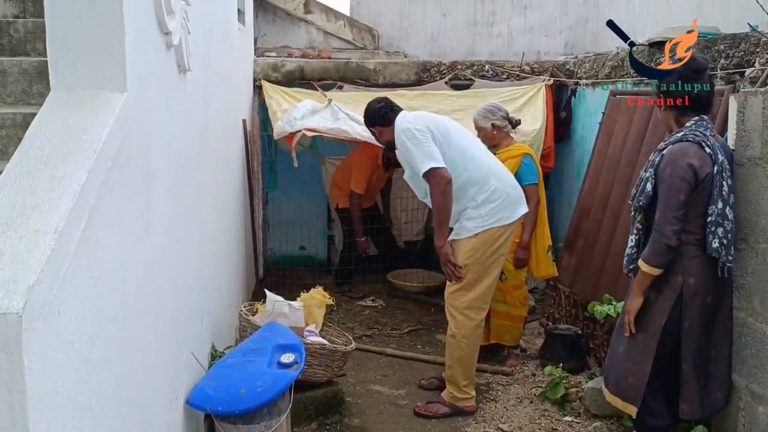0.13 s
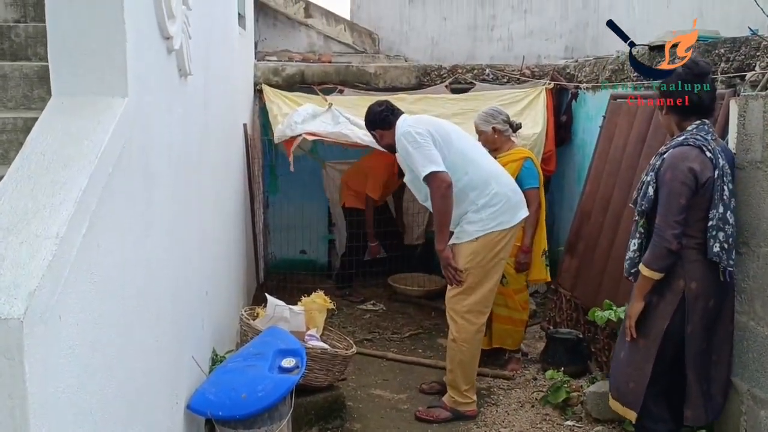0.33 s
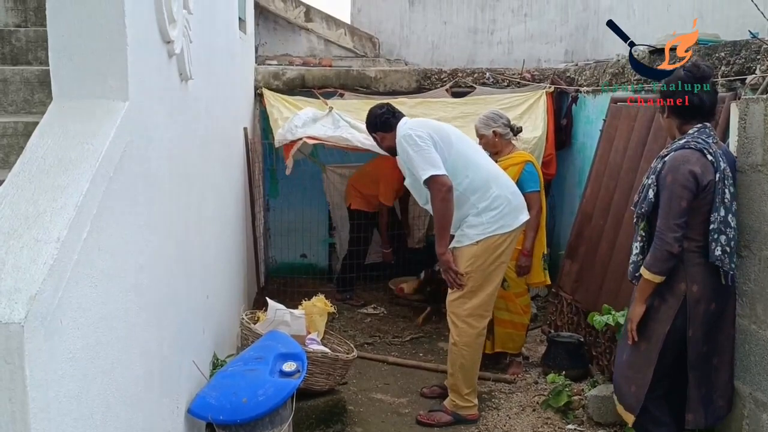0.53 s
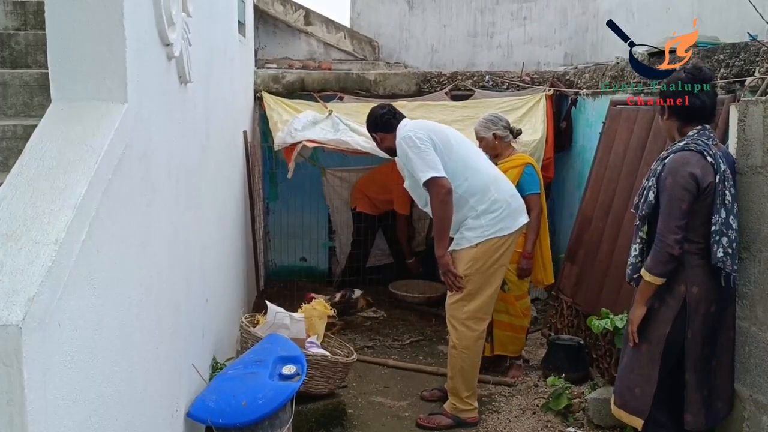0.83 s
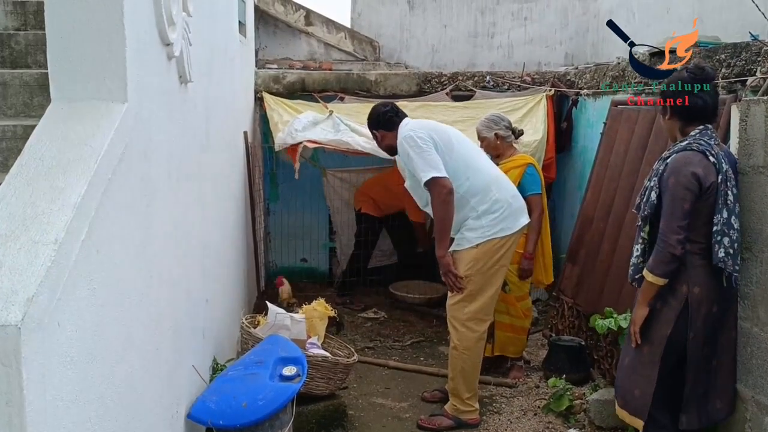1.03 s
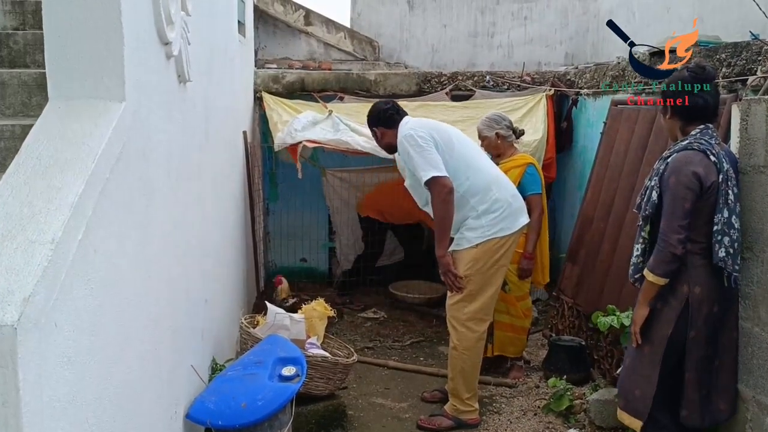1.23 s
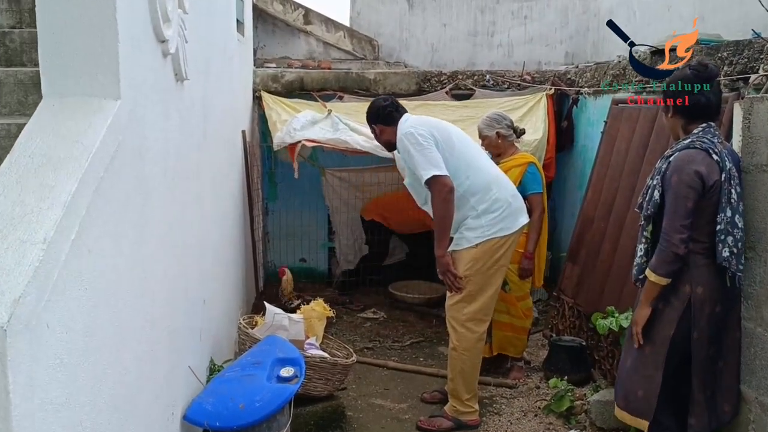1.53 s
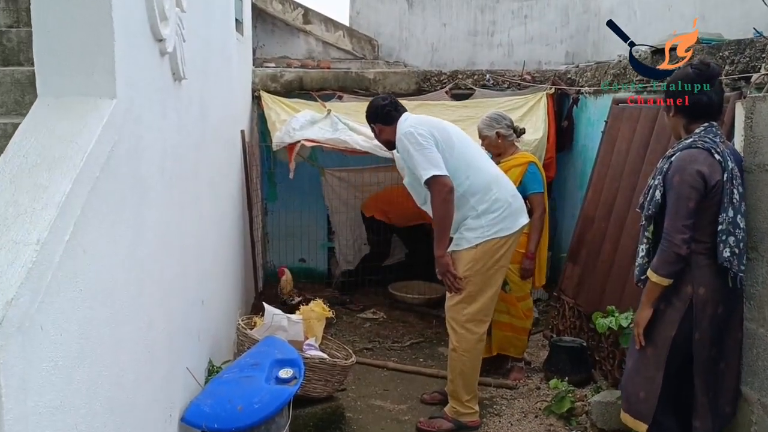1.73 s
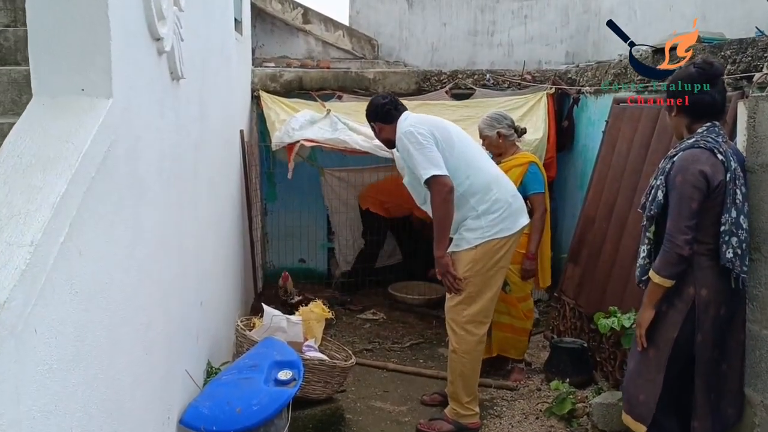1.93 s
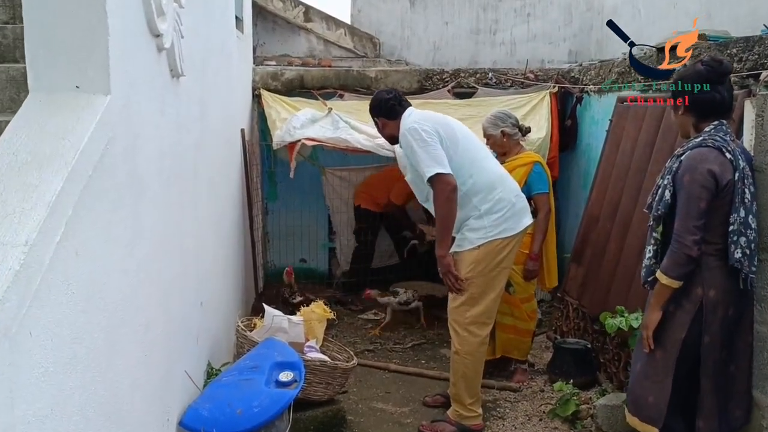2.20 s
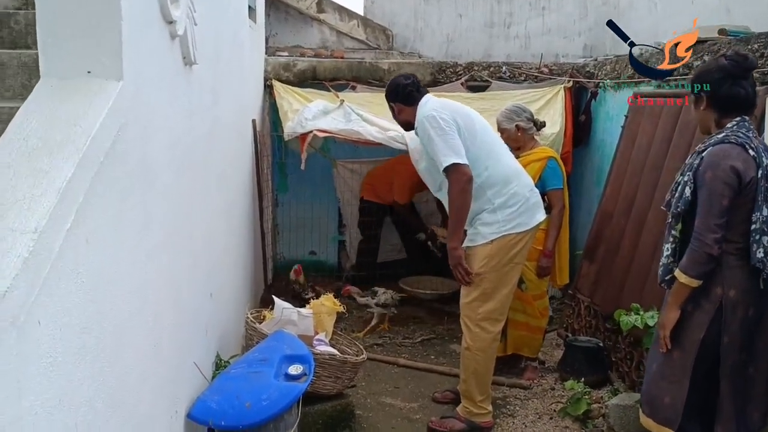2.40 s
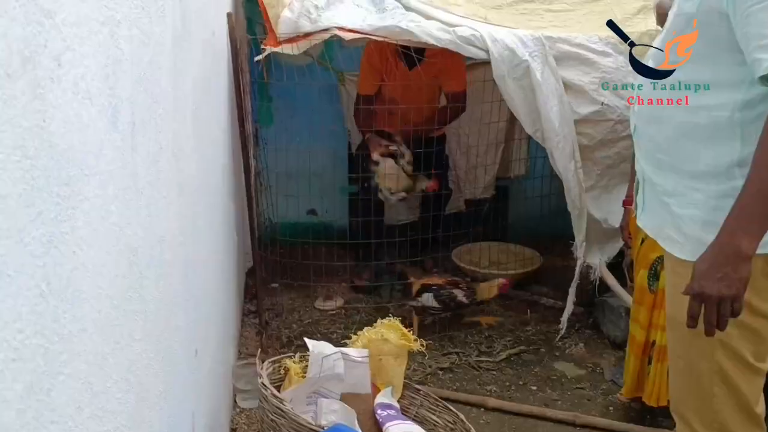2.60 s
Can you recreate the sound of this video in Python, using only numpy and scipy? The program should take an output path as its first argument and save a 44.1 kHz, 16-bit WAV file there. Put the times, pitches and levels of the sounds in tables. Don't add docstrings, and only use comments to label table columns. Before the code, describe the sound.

Chicken clucks building into harsh, fluttering squawks in a walled yard, with wing flaps and wind thumps

```python
import sys
import numpy as np
from scipy import signal
from scipy.fft import rfft, irfft, next_fast_len
from scipy.io import wavfile
from scipy.ndimage import map_coordinates

SR = 44100
rng = np.random.default_rng(int(sys.argv[2]) if len(sys.argv) > 2 else 0)


def materialize(psi):
    bounded = np.clip(np.atleast_2d(psi).T, -1, 1)
    quanta = np.round(bounded * 32767).astype(np.int16)
    wavfile.write(sys.argv[1], SR, quanta)


def to_linear_factor(level_db):
    exponent = np.asarray(level_db, float) / 20
    return 10 ** exponent


N = 121275
SPAN = 30000
LEFT_PUFF_DB = -18.5


def unit(x):
    return x / np.sqrt(np.mean(x ** 2) + 1e-20)


def along(points, hz):
    f, v = np.transpose(points)
    return np.interp(np.log(hz + 1), np.log(f + 1), v)


def wobble(rate_hz, size):
    knots = rng.standard_normal(size // 40)
    return map_coordinates(knots, [np.arange(size) * rate_hz / SR], mode="wrap")


def filtered(x, response):
    n = x.shape[-1]
    m = next_fast_len(n + 4096)
    return irfft(rfft(x, m) * response(np.fft.rfftfreq(m, 1 / SR)), m)[..., :n]


def shaped_noise(shape, points):
    return filtered(rng.standard_normal(shape), lambda f: to_linear_factor(along(points, f)))


def peak(f, hz, width_hz):
    return 1j * f * width_hz / (hz * hz - f * f + 1j * f * width_hz)


def add(track, s, x):
    i = max(round(s * SR), 0)
    track[:, i:i + x.shape[1]] += x[:, :N - i]


# frequency in Hz, t60 in s.
SHED_DECAY = [(250, 0.61), (1000, 0.31), (3000, 0.22), (9000, 0.13)]


def shed(x, lead_ms):
    wall_db, wall_s, tail_db, wide_above_hz = -2, .025, -5.5, 800
    direct, tail_start = 30, 300
    echo = np.zeros((2, SPAN))
    where, size = rng.random((2, 2, 8))
    for side in range(2):
        at = (40 + where[side] * wall_s * SR).astype(int)
        echo[side, at] = to_linear_factor(wall_db) * (2 * size[side] - 1)

    hz, t, z = signal.stft(rng.standard_normal((2, SPAN)), SR, nperseg=256)
    fade = to_linear_factor(-60 * t / along(SHED_DECAY, hz)[:, None])
    tail = signal.istft(z * fade, SR, nperseg=256)[1][:, :SPAN - tail_start]
    echo[:, tail_start:] += to_linear_factor(tail_db) * tail / np.linalg.norm(tail[0])

    half_gap = filtered(echo[0] - echo[1], lambda f: 1 / (1 + (f / wide_above_hz) ** 2)) / 2
    echo += np.array([-half_gap, half_gap])
    echo[:, direct] += 1
    wet = signal.fftconvolve(x[None], echo, axes=1)[:, :SPAN]
    sign = np.array([[1], [-1]])
    return filtered(wet, lambda f: np.exp(1j * np.pi * f * lead_ms / 1000 * sign))[:, direct:]


def syrinx(t, length_s, start_hz, end_hz, rough, highest_hz):
    scoop, scoop_s = .05, .008
    jitter, jitter_rate_hz, uneven = .065, 200, .7
    bend = 1 - scoop * np.exp(-t / scoop_s) + jitter * rough * wobble(jitter_rate_hz, len(t))
    hz = np.interp(t, [0, length_s], [start_hz, end_hz]) * bend
    turn = 2 * np.pi * np.cumsum(hz) / SR
    harmonics = np.arange(1, int(highest_hz / start_hz) + 1)
    pulses = unit(np.cos(np.outer(harmonics, turn)).sum(0))
    pulses *= 1 + uneven * rough * np.cos(turn / 2)
    breath = unit(rng.standard_normal(len(t)) * (1 + np.cos(turn)))
    return pulses, breath, turn


# frequency in Hz, level in dB per Hz.
HISS = [(3000, -16), (4100, -46), (5200, -9), (6600, 7), (7500, 0.5), (9000, 7), (11000, -8),
        (15000, -20.5)]
# frequency in Hz, width in Hz, level in dB.
BEAK = [(1980, 600, 4.5)]


def call(length_s, db, start_hz, end_hz, throat_hz, open_db, swell, upper_hz, rough,
         chest_db, body_db, flutter_db, top_hz, top_db):
    top_width_hz, rasp, hiss_db = 500, 1.6, -14
    rise_power, sag_db, release_s, flutter_rate_hz = 1.2, -6.5, .008, 130
    t = np.arange(SPAN // 2) / SR
    pulses, breath, turn = syrinx(t, length_s, start_hz, end_hz, rough, top_hz + top_width_hz)

    swell = np.clip(swell, .05, .95)
    rise = np.clip(t / (swell * length_s), 0, 1)
    sag = to_linear_factor(sag_db * np.clip(t / length_s - swell, 0, 1) / (1 - swell))
    release = np.exp(-np.clip(t - length_s, 0, None) / release_s)
    flutter = to_linear_factor(flutter_db * rough * np.tanh(wobble(flutter_rate_hz, len(t))))
    shape = rise ** rise_power * sag * release * flutter
    source = (pulses + 2 * rasp * rough * breath) * shape

    def throat(f):
        low_cut_hz = .6 * start_hz
        cut = (1j * f / (low_cut_hz + 1j * f)) ** 2
        narrow = peak(f, throat_hz, 330) ** 2
        skirt = to_linear_factor(-8) * peak(f, 1.086 * throat_hz, 942) ** 2
        body = to_linear_factor(body_db) * peak(f, 648, 334) ** 2
        return cut * (narrow + skirt + body)

    def beak(f):
        middle = sum(to_linear_factor(level) * peak(f, hz, width) ** 2 for hz, width, level in BEAK)
        upper = to_linear_factor(-4) * peak(f, upper_hz, 700) ** 2
        return middle - upper + to_linear_factor(top_db) * peak(f, top_hz, top_width_hz) ** 2

    opening = rise * np.clip(1.6 - t / length_s, .3, 1)
    hiss = to_linear_factor(hiss_db) * filtered(breath * shape, lambda f: to_linear_factor(along(HISS, f)))
    voice = filtered(source, throat) + to_linear_factor(open_db) * (filtered(source * opening, beak) + hiss)
    voice /= np.sqrt(np.mean(voice[:int(length_s * SR)] ** 2))
    chest = to_linear_factor(chest_db) * 2 * (1 - rough) ** 2 * shape * np.sin(turn)
    return to_linear_factor(db) * (voice + chest)


def flock(notes, beaks, roughs, kind):
    out = np.zeros((2, N))
    for (s, *note), (throat_hz, open_db, lead_ms, *beak), rough in zip(notes, beaks, roughs):
        add(out, s, shed(call(*note, throat_hz, open_db, *beak, rough, *kind), lead_ms))
    return out


# start in s, length in s, level in dB, start pitch in Hz, end pitch in Hz.
CLUCKS = [(0.0, 0.0057, -26, 438, 445), (.184, 0.033, -29.5, 308.7, 289), (.34, 0.028, -28.5, 520.4, 495.6),
          (.497, 0.038, -23.5, 267.7, 260), (.647, 0.035, -22.5, 254, 251.8),
          (.825, 0.035, -20, 251.6, 236.9), (1.18, 0.027, -23.5, 266.2, 293.7),
          (1.262, 0.079, -29.5, 536.6, 518), (1.342, 0.073, -32.5, 342.8, 355.5),
          (1.505, 0.024, -19, 259.8, 311), (2.183, 0.04, -19, 248.2, 242.3), (2.555, 0.032, -18, 265, 268)]
# throat in Hz, open-beak level in dB, left lead in ms, rising share, upper beak in Hz.
CLUCK_BEAK = [(810, -58, -0.144, 0.1, 3400), (798, -67, -0.14, 0.22, 2600), (1107, -7, -0.058, 0.96, 2890),
              (1437, -17, 0.17, 0.76, 3140), (900, -8.5, 0.061, 0.53, 2830),
              (906, -10.5, 0.092, 0.88, 2950), (870, -47, 0.13, 0.47, 2800), (1433, -15, -0.2, 0.21, 2820),
              (1010, -12, -0.13, 0.2, 3100), (830, -9, 0.058, 0.67, 3780), (837, -15.5, 0.14, 1, 2900),
              (1018, -15.5, 0.073, 0.84, 3220)]
CLUCK_ROUGH = [.3, .15, .38, .4, .4, .45, .15, .55, .7, .4, .55, .45]
# fundamental in dB, body in dB, flutter in dB, top resonance in Hz, its level in dB.
CLUCK_KIND = (-8, -10, 4.5, 5200, -13)


def clucks():
    return flock(CLUCKS, CLUCK_BEAK, CLUCK_ROUGH, CLUCK_KIND)


# start in s, length in s, level in dB, start and end pitch in Hz.
SQUAWKS = [(1.478, 0.0545, -17, 658.7, 737), (1.528, 0.055, -14, 881, 900),
           (1.535, 0.1464, -15, 729.2, 694.7), (1.678, 0.0307, -24.5, 701, 577),
           (1.800, 0.047, -17, 688.7, 722), (1.836, 0.044, -14.5, 664.5, 634),
           (1.992, 0.0957, -19, 672.9, 711), (2.088, 0.021, -18, 730, 773.4), (2.102, 0.019, -20, 718, 616),
           (2.254, 0.018, -21, 576, 709), (2.274, 0.026, -15.5, 641.4, 631), (2.294, 0.04, -11, 865, 799),
           (2.336, 0.079, -14.5, 734, 686.4), (2.46, 0.11, -29.5, 611, 584), (2.5, 0.057, -30, 876, 681),
           (2.598, 0.037, -23.5, 537, 560.7), (2.636, 0.015, -20.5, 611, 597),
           (2.735, 0.041, -29, 791, 810), (.035, 0.048, -55, 2200, 2720), (.295, 0.06, -48, 2000, 1546),
           (.455, 0.022, -52, 1960, 2140), (.545, 0.061, -48, 1000, 1040), (1.9, 0.33, -40, 456.3, 419),
           (1.452, 0.05, -31.5, 512, 568)]
# throat in Hz, open-beak level in dB, left lead in ms, rising share, upper beak in Hz.
SQUAWK_BEAK = [(1430, -14, -0.2, 0.26, 2860), (1650, -16, -0.29, 0.13, 2650),
               (1446, -11, -0.26, 0.38, 2600), (1220, -15, -0.19, 0.24, 2400),
               (1534, -13.5, -.27, 0.34, 3050), (1307, -9, -0.246, 0.15, 3070),
               (1270, -12, -0.21, 0.18, 2870), (1370, -12.5, -0.14, 0.72, 3500),
               (1230, -17, -0.29, 0.32, 3030), (1240, -15, 0.041, 0.77, 2600),
               (810, -7.5, -0.059, 0.39, 2570), (858, -11, -0.05, 0.1, 2000), (884, -9, -.24, 0.17, 2690),
               (1300, -21.5, -0.082, 0.16, 2100), (1470, -13, -0.04, 1, 2700),
               (1000, -23.5, -0.062, 0.081, 2600), (1290, -23.5, -0.16, 0.33, 8400),
               (1740, -23, -0.079, 0.39, 5800), (2440, -12, 0.13, .3, 3000), (1630, -29, .05, .3, 2700),
               (2000, -19, 0.43, .3, 3000), (1990, -14, -0.013, .3, 3000), (533, -9.5, .26, 0.2, 3400),
               (1150, -13, -0.047, 0.31, 3300)]
SQUAWK_ROUGH = [.35, .4, .58, .3, .7, .62, .13, .22, .5, .2, .45, .1, .58, .4, .75, .35, .2, .6, .1, .2, .2,
                .55, .95, .3]
# fundamental in dB, body in dB, flutter in dB, top resonance in Hz, its level in dB.
SQUAWK_KIND = (-9, -17, 9, 4200, -11)


def squawks():
    return flock(SQUAWKS, SQUAWK_BEAK, SQUAWK_ROUGH, SQUAWK_KIND)


# time in s, level in dB.
PUFFS = [(0.0, -47), (0.22, -67), (0.26, -36), (0.3, -50), (0.57, -55), (0.892, -35.5), (1.13, -60.5),
         (1.75, -41.5), (1.78, -51.5), (2.431, -65), (2.46, -48), (2.75, -46.5)]
# frequency in Hz, level in dB per Hz.
RUMBLE = [(13, -12), (22, 0), (102, -1.5), (168, -11), (230, -16), (300, -48), (510, -120)]


def wind():
    s, db = np.transpose(PUFFS)
    lump_db = 1.5
    lumps = to_linear_factor(lump_db * np.array([wobble(13.5, N), wobble(23.7, N)]))
    rumble = unit(shaped_noise((2, N), RUMBLE) * lumps)
    strength = to_linear_factor(np.interp(np.arange(N) / SR, s, db) + 3.5)
    return rumble * strength * to_linear_factor(np.array([[LEFT_PUFF_DB], [0]]))


# frequency in Hz, level in dB per Hz.
YARD = [(100, -4), (200, 0), (800, -7), (1500, -6.5), (4000, -17), (9000, -19), (15500, -29.5)]


def yard():
    level_db, sway_db = -51.5, 2
    a, b = shaped_noise((2, N), YARD)
    ports = unit(np.array([a + 0.91 * b, a - 0.47 * b]))
    return to_linear_factor(level_db + sway_db * wobble(8.31, N)) * ports


# time in s, peak in dB, pitch in Hz.
SLAPS = [(.258, -24, 84.5), (.738, -24, 91), (.808, -26, 61.6), (.858, -16.5, 85), (.897, -15.5, 135),
         (.978, -23, 88), (1.035, -36, 81), (1.19, -34, 70.2), (1.56, -29, 111), (1.74, -44, 60)]


def slaps():
    out, t = np.zeros((2, N)), np.arange(-1500, 1500) / SR
    ports = to_linear_factor(np.array([[2 * LEFT_PUFF_DB], [0]]))
    for k, (s, db, hz) in enumerate(SLAPS):
        u = (np.pi * hz * t) ** 2
        push = (-1) ** k * to_linear_factor(db) * (1 - 2 * u) * np.exp(-u)
        add(out, s + t[0], push * ports)
    return out


# start in s, length in s, level in dB.
FLAPS = [(0.429, 0.017, -40.5), (0.489, 0.089, -35.5), (0.605, 0.1, -38.5), (0.814, 0.032, -36),
         (0.913, 0.023, -46), (1.025, 0.93, -51), (1.398, 0.022, -29.5), (1.434, 0.017, -24),
         (1.724, 0.17, -41), (2.452, 0.21, -48.5)]
# frequency in Hz, level in dB per Hz.
FEATHERS = [(300, 1), (1200, 8.5), (2500, 10.5), (5000, -10.5), (9000, -1), (12500, -18.5), (15500, -20)]


def flaps():
    grain_db, grain_rate_hz, attack_s, lead_ms = 5.5, 400, 0.0064, 0.17
    out, t = np.zeros((2, N)), np.arange(SPAN // 2) / SR
    for s, length_s, db in FLAPS:
        grains = rng.standard_normal(len(t)) * to_linear_factor(grain_db * wobble(grain_rate_hz, len(t)))
        rustle = unit(filtered(grains, lambda f: to_linear_factor(along(FEATHERS, f))))
        swell = np.clip(t / attack_s, 0, 1) * np.exp(-(t / length_s) ** 2)
        add(out, s, shed(to_linear_factor(db) * rustle * swell, lead_ms))
    return out


# time in s, level in dB.
KNOCK = [(1.4, -20)]
# frequency in Hz, level in dB, t60 in s.
PAN = [(231, -3, 0.16), (597, 1, 0.16), (780, -3, 0.31), (1140, 2, 0.077)]


def pan():
    attack_s, damped_t60_s, lead_ms = 0.0038, 0.069, 0.028
    out, t = np.zeros((2, N)), np.arange(SPAN // 2) / SR
    ring = sum(to_linear_factor(db - 60 * t / t60) * np.sin(2 * np.pi * hz * t) for hz, db, t60 in PAN)
    for s, db in KNOCK:
        knock = to_linear_factor(db - 60 * t / damped_t60_s) * ring * np.clip(t / attack_s, 0, 1)
        add(out, s, shed(knock, lead_ms))
    return out


def scene():
    return clucks() + squawks() + wind() + yard() + slaps() + flaps() + pan()


def low_pass(x):
    return signal.sosfilt(signal.butter(12, 15730, fs=SR, output="sos"), x)


# frequency in Hz, gain in dB.
LEFT_DULL = [(6000, 0), (8500, -8), (12500, 0)]


def record(dry):
    ceiling, top_hz = .95, 15730
    left = filtered(dry[0], lambda f: to_linear_factor(along(LEFT_DULL, f)))
    ports = np.array([left, dry[1]])
    held = ports / (1 + np.abs(ports / ceiling) ** 4) ** (1 / 4)
    mix = filtered(held, lambda f: f < top_hz)
    return low_pass(mix)


dry = scene()
out = record(dry)
materialize(out)
```